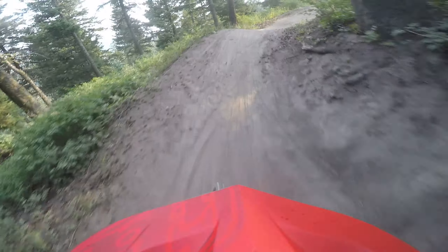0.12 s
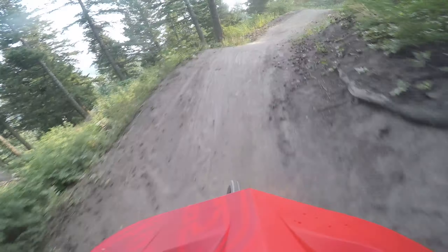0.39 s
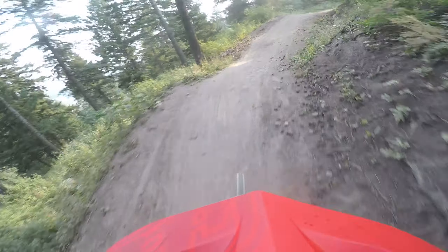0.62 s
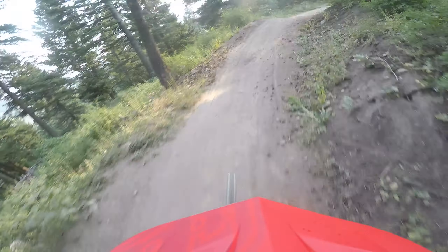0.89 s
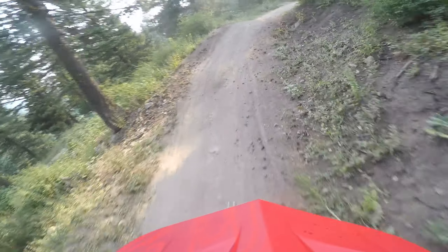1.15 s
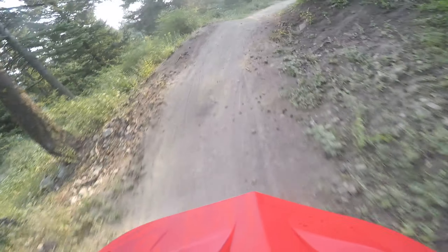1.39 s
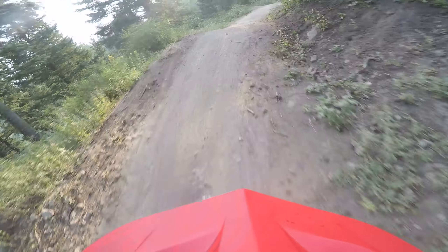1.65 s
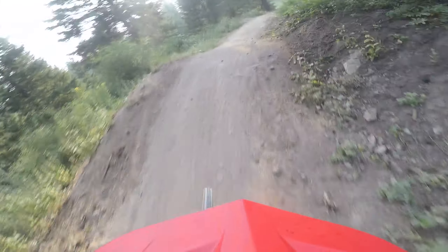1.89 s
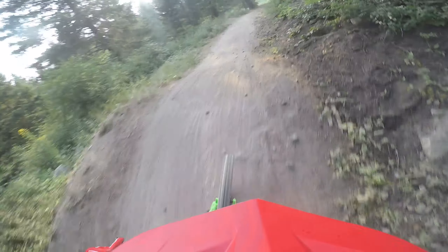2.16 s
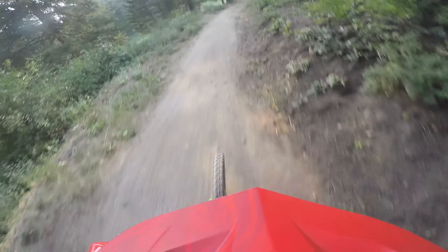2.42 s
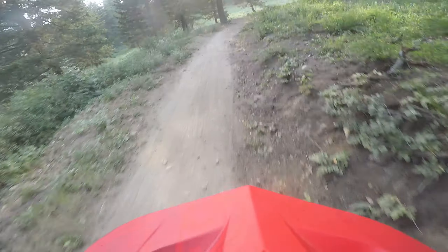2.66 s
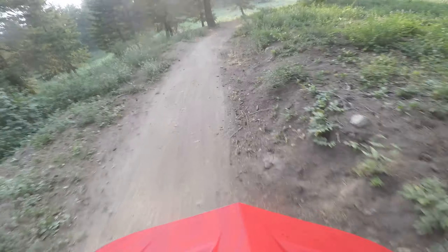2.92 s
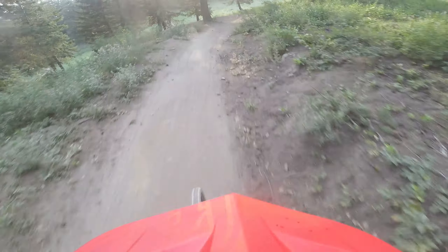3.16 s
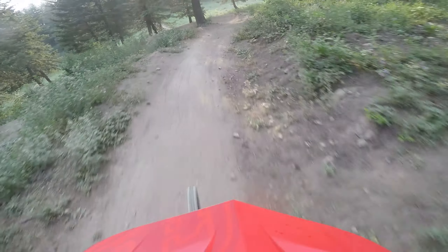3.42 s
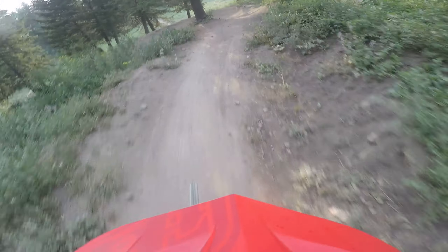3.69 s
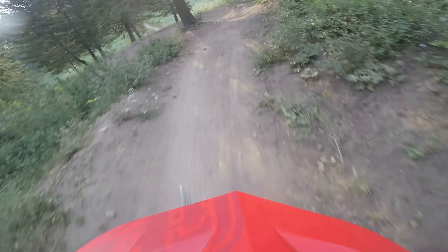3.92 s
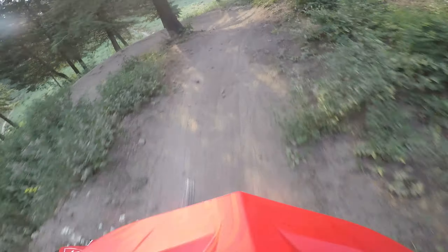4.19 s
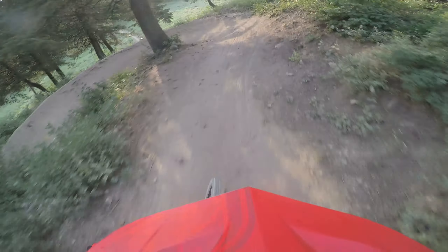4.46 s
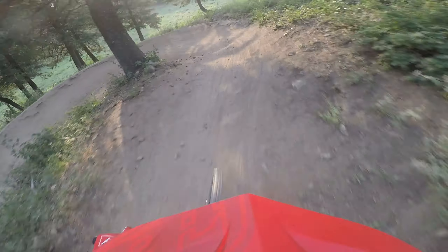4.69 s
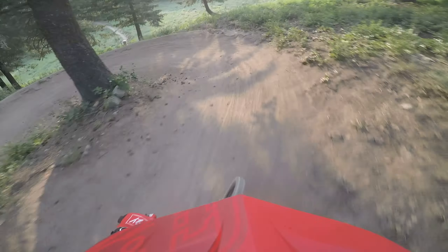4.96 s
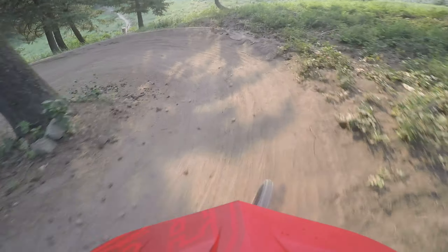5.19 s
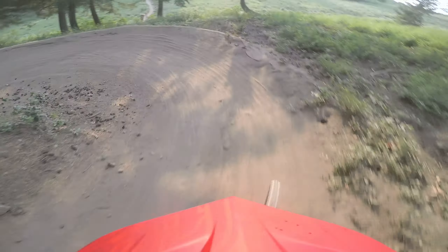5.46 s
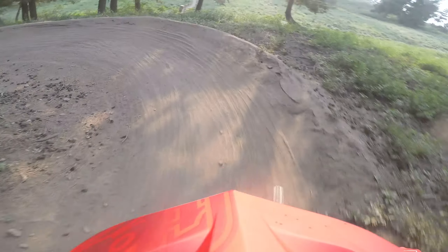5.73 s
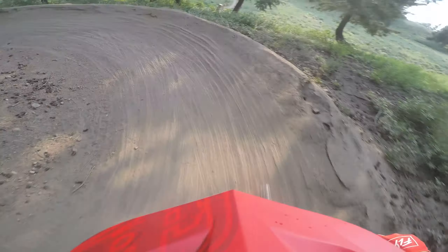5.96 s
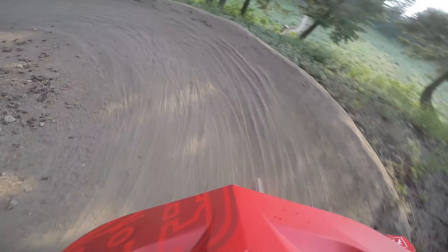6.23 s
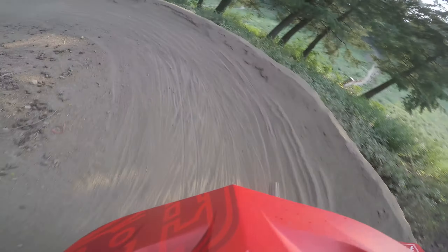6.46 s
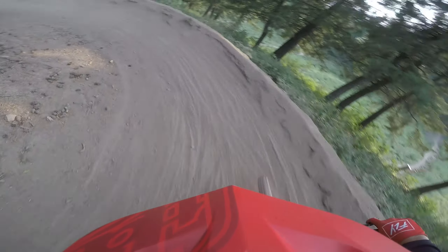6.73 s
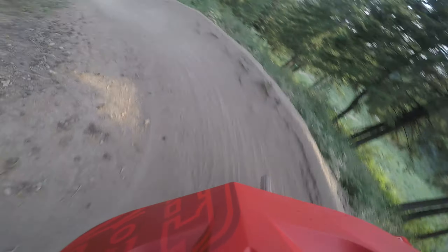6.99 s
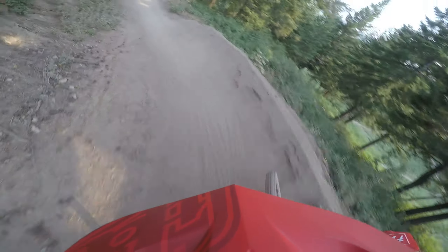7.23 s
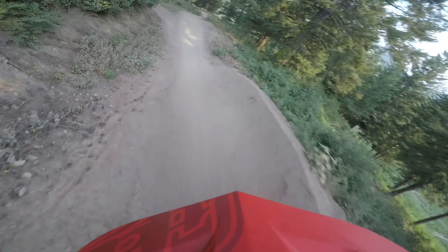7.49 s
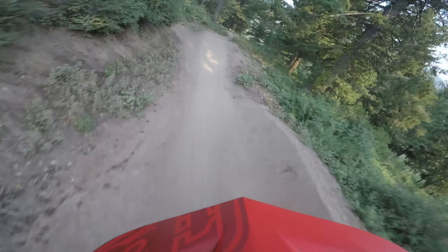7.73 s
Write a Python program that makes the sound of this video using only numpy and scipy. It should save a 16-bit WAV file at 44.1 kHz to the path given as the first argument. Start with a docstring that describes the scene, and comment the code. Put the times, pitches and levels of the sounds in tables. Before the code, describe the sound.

Forest bike trail from the rider's helmet: low wind buffeting, hollow rumble of tyres and a faint airy hiss. The camera mount clacks and rattles at each jolt, with hard landings near two and two and a half seconds. After a quieter middle, drumming and thumps strengthen and spread wide, with barely audible high brake squeaks and a coarse tread roar at the end.

```python
"""On a dirt trail, a camera fixed to the helmet of a rider on a fast bicycle descent, eight seconds. From the
start wind noise buffets the ports and a faint steady hiss lies beneath; tyres drum, grit and tread roar as
shaped noise, bumps thump in damped swings and knocks ring the shell's modes. From 0.4 s the mount's arm tings,
its clip cracks, and from 1.1 s landings bob the head. From 4.3 to 4.9 s the camera fades from its one-port wind
mode to both ports, which hear the shaking shell in opposite phase. Faint brake squeaks follow after 5.2 s."""
import sys
import numpy as np
from scipy import signal
from scipy.fft import rfft, irfft, next_fast_len
from scipy.io import wavfile
from scipy.ndimage import uniform_filter1d

SR = 44100
rng = np.random.default_rng(int(sys.argv[2]) if len(sys.argv) > 2 else 0)


def dump_mix(stems):
    """Bounce the given channels to the path in sys.argv[1] as a 16-bit WAV at rate SR."""
    frames = np.atleast_2d(stems).T  # one column per channel
    limited = np.clip(frames, -1, 1)  # hard clip at full scale
    pcm = np.round(limited * 32767).astype(np.int16)
    wavfile.write(sys.argv[1], SR, pcm)


def gain_from_db(level_db):
    """Turn a decibel level (scalar or array-like) into a linear amplitude factor."""
    decades = np.asarray(level_db, float) / 20
    return 10 ** decades


N = 347067


def evened(x):
    """Scales to unit rms."""
    return x / np.sqrt(np.mean(x ** 2) + 1e-20)


def read(points, hz, column=1):
    """Reads a spectrum on a log-frequency axis."""
    table = np.transpose(points)
    return np.interp(np.log(hz + 1), np.log(table[0] + 1), table[column])


def curve(rows, column=1):
    """Reads a curve in time at every sample."""
    table = np.transpose(rows)
    return np.interp(np.arange(N) / SR, table[0], table[column])


def coloured(x, gain):
    """Filters with a gain that is a function of frequency."""
    size = next_fast_len(N)
    spectrum = rfft(x, size) * gain(np.fft.rfftfreq(size, 1 / SR))
    return irfft(spectrum, size)[..., :N]


def lumps(per_s):
    """Slow random swings of unit rms, weaker above a rate."""
    return evened(coloured(rng.standard_normal(N), lambda hz: 1 / (1 + (hz / per_s) ** 2)))


def noise(points, lumpy_db, per_s):
    """Two draws of coloured noise that swell together, with unit rms overall."""
    draws = rng.standard_normal((2, N)) * gain_from_db(lumpy_db * lumps(per_s))
    return evened(coloured(draws, lambda hz: gain_from_db(read(points, hz))))


def ring(hz, db, t60):
    """One mode that dies by 60 dB in t60 seconds."""
    t = np.arange(4000) / SR
    return gain_from_db(db - 60 * t / t60) * np.sin(2 * np.pi * hz * t)


def add(mix, s, sound):
    """Mixes a sound in at a time, cut at the end of the scene."""
    part = mix[round(s * SR):][:len(sound)]
    part += sound[:len(part)]


# wind pressure on the microphone ports: time_s, level_db
WIND_GUSTS = [(0, -14), (.15, -20), (.4, -19.5), (.7, -18), (1.2, -15), (1.28, -23), (1.45, -21.5),
              (1.6, -12.5), (1.82, -13), (1.9, -16), (2.05, -23), (2.2, -18), (2.48, -25), (2.7, -30.5),
              (2.95, -12.5), (3.25, -16.5), (3.85, -22.5), (4.6, -16), (4.9, -8.5), (5.6, -15),
              (6.0, -15.5), (6.4, -13.5), (7.0, -16), (7.2, -15.5), (7.55, -14.5), (7.87, -18.5)]
# its spectrum: frequency_hz, level_db
WIND_SPECTRUM = [(6, 4), (14, 3.5), (35, 2.5), (60, -8.5), (90, -30), (130, -53), (300, -92), (600, -130)]


def wind():
    """Turbulent air presses on the ports in lumpy swings of low pitch."""
    return gain_from_db(curve(WIND_GUSTS)) * noise(WIND_SPECTRUM, lumpy_db=1.6, per_s=10)


# the trail as it comes through bike and rider: time_s, drumming_db, grit_db
TRAIL_SHAKE = [(0, -33.5, -41), (.4, -32.5, -41), (.88, -26, -45.5), (1.15, -31.5, -43.5),
               (1.42, -36.5, -42.5), (1.65, -32, -42), (2.0, -27.5, -38.5), (2.15, -30.5, -44),
               (2.5, -32.5, -43.5), (2.65, -44, -45.5), (2.95, -32, -46), (3.2, -28.5, -45),
               (4.2, -31, -47.5), (4.6, -26.5, -44.5), (4.85, -22.5, -37.5), (5.25, -23.5, -40.5),
               (5.6, -27.5, -42.5), (6.0, -22.5, -41), (6.35, -29.5, -46), (6.9, -24, -39),
               (7.4, -19.5, -42), (7.87, -21.5, -33)]
# spectrum of the drumming: frequency_hz, level_db
DRUM_SPECTRUM = [(30, -52), (55, -8.5), (85, -2), (112, -1.5), (142, 4.5), (178, -4), (215, -3),
                 (265, -7.5), (330, -22.5), (500, -31), (1000, -110)]


def drumming():
    """Tyres over ruts and stones, felt through the body; deep and hollow parts also swell on their own."""
    split_hz = 175
    deep_power = lambda hz: 1 / (1 + (hz / split_hz) ** 8)
    deep = noise(DRUM_SPECTRUM, lumpy_db=2.2, per_s=12)
    deep = coloured(deep, lambda hz: np.sqrt(deep_power(hz)))
    hollow = noise(DRUM_SPECTRUM, lumpy_db=2.6, per_s=12)
    hollow = coloured(hollow, lambda hz: np.sqrt(1 - deep_power(hz)))
    return gain_from_db(curve(TRAIL_SHAKE) + 2.6 * lumps(9)) * (deep + hollow)


# spectrum of the grit: frequency_hz, level_db
GRIT_SPECTRUM = [(150, -70), (250, -13.5), (380, -8), (700, -3), (1150, -11.5), (1350, -9), (1500, -11.5),
                 (2400, -24.5), (2850, -29), (3150, -24.5), (3500, -35), (5000, -52), (9000, -100)]
# modes of the helmet shell and mount, also rung by the knocks: pitch_hz, level_db, t60_s
SHELL_MODES = [(540, 13.5, 0.0057), (740, 2.5, 0.037), (900, 13.5, 0.012), (1070, -2.5, 0.017),
               (1177, 15.5, 0.016), (1298, 1.5, 0.08), (1995, 9, 0.0072), (2185, -9.5, 0.0041),
               (2740, -13, 0.0033), (3470, 6, 0.0053), (4470, 5, 0.014), (5340, 3, 0.005),
               (5840, -1, 0.0067), (6800, 1, 0.0031), (8700, -5, 0.0097)]


def grit():
    """Countless small jolts ring the shell over a broad rush."""
    jolts_per_s = 1500
    struck = rng.random(N) < jolts_per_s / SR
    size_db = 2.1 * np.minimum(rng.exponential(1, N), 5) + 2 * lumps(25)
    jolts = struck * gain_from_db(size_db) * rng.standard_normal((2, N))
    shell = sum(ring(*mode) for mode in SHELL_MODES)
    rung = signal.oaconvolve(jolts, shell[None], axes=1)[:, :N]
    rung = evened(coloured(rung, lambda hz: gain_from_db(read(GRIT_SPECTRUM, hz))))
    rush = noise(GRIT_SPECTRUM, lumpy_db=1.5, per_s=13)
    return gain_from_db(curve(TRAIL_SHAKE, column=2)) * (0.5 * rung + 0.73 * rush)


# a faint steady hiss: time_s, level_db
HISS_LEVEL = [(0, -59.5), (2, -60), (4, -60), (5, -58.5), (6, -58), (7.87, -61)]
# its spectrum: frequency_hz, level_db
HISS_SPECTRUM = [(800, -51), (2000, 7.5), (3000, -1), (4400, -1), (5200, -3), (6200, -2), (7500, -4.5),
                 (9500, -2.5), (11000, -6.5), (13000, -13.5), (15000, -22), (17000, -66)]


def hiss():
    """A smooth, faint hiss: nearly steady noise, mostly treble."""
    return gain_from_db(curve(HISS_LEVEL)) * noise(HISS_SPECTRUM, lumpy_db=0.4, per_s=30)


# tyre roar that arrives through the air: time_s, level_db
ROAR_LEVEL = [(0, -46), (.3, -45), (.5, -69), (1.5, -53), (2.5, -88), (3.5, -58), (4, -57), (4.5, -82),
              (5.5, -55), (6, -54), (6.6, -48), (6.8, -50.5), (7.42, -59), (7.52, -47), (7.87, -43.5)]
# its spectrum: frequency_hz, level_db
TREAD_SPECTRUM = [(600, -46), (900, 1), (1020, 7.5), (1140, -4.5), (1340, 8.5), (1500, -9.5), (1900, -6.5),
                  (2700, -14.5), (3050, -6.5), (3350, -15), (3700, -23), (4200, -21), (7000, -74)]


def roar():
    """Tread blocks on packed dirt, louder where a bank throws the sound back."""
    return gain_from_db(curve(ROAR_LEVEL)) * noise(TREAD_SPECTRUM, lumpy_db=1.2, per_s=20)


# the tread singing against the bank: time_s, level_db
SINGING_LEVEL = [(0, -57), (1, -68), (3.4, -70), (3.7, -68), (4.2, -64), (5.8, -55), (6.3, -69), (6.6, -66),
                 (6.9, -68), (7.4, -53), (7.52, -40), (7.7, -46), (7.87, -34)]
# its resonances: pitch_hz, width_hz, level_db
SINGING_BANDS = [(988, 48, 21), (1600, 90, -8), (2100, 98, -13), (3040, 150, -20), (3700, 140, -12)]


def singing():
    """The tread sings against the bank: noise in a few narrow bands."""
    def bands(hz):
        """Sums the resonance curves."""
        return sum(gain_from_db(db) / (1 + (2 * (hz - pitch) / width) ** 2) for pitch, width, db in SINGING_BANDS)
    return gain_from_db(curve(SINGING_LEVEL)) * evened(coloured(rng.standard_normal(N), bands))


# hard bumps that rock the whole helmet: start_s, level_db, pitch_hz of the rocking
HELMET_THUMPS = [(0.019, -17, 152), (0.094, -27.5, 240), (0.445, -25, 250), (0.88, -18.5, 243),
                 (1.145, -12, 122), (1.231, -23, 151), (1.385, -24.5, 257), (1.568, -27, 272),
                 (1.831, -18, 150), (1.992, -14.5, 195), (2.048, -16.5, 270), (2.19, -23.5, 247),
                 (2.494, -10, 170), (2.912, -22, 226), (3.099, -19.5, 185), (3.144, -17, 141),
                 (3.289, -27, 268), (3.393, -24, 188), (3.684, -26, 242), (4.023, -11.5, 153),
                 (4.65, -14, 200), (4.815, -21, 223), (5.132, -20.5, 221), (5.195, -18, 237),
                 (5.259, -18, 161), (5.38, -21.5, 199), (5.434, -13, 132), (5.933, -14, 110),
                 (5.993, -16, 235), (6.065, -17.5, 100), (6.125, -12.5, 100), (6.147, -12, 258),
                 (6.228, -11.5, 120), (6.365, -23, 132), (6.681, -7, 110), (6.686, -8.5, 236),
                 (6.874, -14, 200), (6.913, -14, 237), (7.014, -17, 200), (7.165, -19, 207),
                 (7.224, -19, 110), (7.298, -12.5, 204), (7.385, -9.5, 181), (7.483, -15, 151),
                 (7.536, -18, 202), (7.642, -8, 125), (7.678, -9.5, 146)]


def thumps():
    """Each bump makes the helmet rap, rock, nod and heave once, in damped swings."""
    out, t = np.zeros((2, N + 5000)), np.arange(4000) / SR
    spread = 0.07  # of the pitches from bump to bump

    def swing(hz, rise_s, decay_s):
        """One damped swing that grows from rest."""
        return np.sin(2 * np.pi * hz * t) * (t / rise_s) * np.exp(1 - t / decay_s)

    chance = rng.standard_normal((len(HELMET_THUMPS), 2, 2))
    for (s, db, hz), draws in zip(HELMET_THUMPS, chance):
        for side, (sign, detune) in enumerate(draws):
            rock = swing(hz, 0.0036, 0.004)
            rap = swing(1.43 * hz * (1 - spread * detune), 0.0048, 0.0044)
            nod = swing(80 * (1 + spread * detune), 0.0037, 0.0046)
            heave = swing(36 * (1 + spread * detune), 0.024, 0.0064)
            bump = 0.12 * rap + 1.02 * rock + 0.39 * nod + 0.2 * heave
            add(out[side], s, gain_from_db(db) * np.sign(sign) * bump)
    return out[:, :N]


def rattles():
    """Knock rows for small blows at random moments and places on the shell, louder where grit is."""
    per_s = 4
    when, size, place = rng.random((round(per_s * N / SR), 3)).T
    shake_db = 1.6 * (curve(TRAIL_SHAKE, column=2) + 37.5)
    rows = []
    for a, b, c in zip(when, size, place):
        level_db = -37 + shake_db[int(a * N)] - 4.5 * np.log(1 - b)
        rows.append((a * N / SR, level_db, -10, 600 + 660 * c, 5))
    return rows


# knocks of the mount: struck_s, level_db of the low modes, hardness_db (middle modes re low),
# pitch_hz favoured, decay_length (0.49 ms each)
MOUNT_KNOCKS = [(0.02, -26, -17, 740, 8.1), (0.447, -19, -6, 750, 3.9), (0.515, -16, -6.5, 1140, 3.2),
                (0.756, -18.5, -13, 1040, 3.8), (0.844, -25, -7, 1140, 9.8), (0.879, -12, -12, 920, 8.7),
                (1.106, -21.5, -8, 900, 6.2), (1.141, -17, -3.5, 950, 6.4), (1.179, -27, -7, 690, 5.8),
                (1.223, -29, -22, 676, 3.7), (1.382, -18.5, -12, 895, 4), (1.482, -21, -9.5, 1040, 7.4),
                (1.571, -17, -7, 750, 4.8), (1.645, -29, -14, 796, 5.8), (1.693, -24, -11.5, 473, 1.7),
                (1.772, -16.5, -2, 900, 3.7), (1.782, -25.5, 3, 800, 4), (1.814, -23, -7, 800, 2),
                (1.827, -20.5, -22, 716, 3.6), (1.918, -23.5, -12, 700, 8), (1.869, -27, -14, 1340, 4.5),
                (1.975, -17, -11.5, 900, 23), (1.982, -20.5, -2, 800, 3.7), (1.99, -9.5, -14, 630, 3.3),
                (2.0, -22.5, -7, 1110, 8), (2.014, -13, -14, 950, 4.5), (2.024, -21, -8, 1030, 21),
                (2.055, -6.5, -10.5, 520, 4.7), (2.066, -21, -2.5, 950, 12), (2.076, -28, 2, 1100, 7.6),
                (2.112, -27.5, -4.5, 830, 3.3), (2.192, -20.5, -9, 650, 2.5), (2.202, -28, -17, 900, 3),
                (2.221, -32, -31, 805, 4), (2.255, -15.5, -12, 960, 5), (2.404, -23.5, -7, 740, 3.5),
                (2.42, -20.5, -5.5, 1160, 3.3), (2.431, -25.5, -11, 750, 3.9),
                (2.458, -23.5, -12, 750, 1.8), (2.486, -20.5, -11, 800, 7), (2.499, -21, -11.5, 540, 5.4),
                (2.886, -24.5, -9, 830, 10), (2.918, -26, -23, 750, 5.9), (3.097, -27, -10, 690, 4.8),
                (3.148, -24.5, -17, 740, 6), (3.291, -13.5, -11, 1130, 1.3), (4.025, -31, -14, 705, 7.8),
                (4.16, -21, -6, 510, 3.1), (4.538, -22, -10, 940, 6), (4.767, -29, -3.5, 900, 2),
                (4.923, -22, -11.5, 694, 6.3), (5.035, -24, -27, 900, 9.4), (5.196, -14.5, -39, 530, 13),
                (5.26, -18, -14.5, 496, 5), (5.286, -12, -10.5, 1100, 2.7), (5.38, -16, -25, 540, 12),
                (5.43, -30, -12, 670, 11), (5.934, -22, -16, 576, 14), (5.974, -17, -16, 594, 6.9),
                (5.994, -21, -16, 560, 9.2), (6.118, -18.5, -19, 577, 83), (6.148, -14.5, -12.5, 485, 2.9),
                (6.228, -18.5, -46, 670, 12), (6.689, -10, -14.5, 520, 4.3), (6.751, -12, -15, 1070, 2.6),
                (6.873, -25, -28, 676, 5.4), (6.916, -8.5, -10, 1120, 2.5), (7.014, -10.5, -14.5, 450, 5.3),
                (7.166, -14, -14.5, 514, 4), (7.301, -15.5, -41, 490, 4.6), (7.332, -24, -15, 654, 14),
                (7.385, -18, -20, 506, 47), (7.489, -21.5, -37, 673, 11), (7.534, -19.5, -19, 553, 11),
                (7.644, -23.5, -12, 580, 42), (7.679, -12.5, -16, 640, 4.8), (7.699, -13, -14.5, 900, 12)]
# how sharp a contact the low, middle and high modes feel: cutoff_hz of each
CONTACT_CUTOFFS = (2030, 4250, 9800)


def knocks():
    """A short chatter of contacts rings the shell; a harder blow reaches the higher modes."""
    out, t = np.zeros((2, N + 5000)), np.arange(4000) / SR
    lead_s, rise_s = 0.0055, 0.007  # the chatter starts before the knock and swells to its peak
    overtone, shift = 2.65, 0.03  # pitch ratio of the middle modes; pitch spread by grip of the contact
    hz = np.transpose(SHELL_MODES)[0]
    group = (hz > 1500) * 1 + (hz > 3300)  # 0 low, 1 middle, 2 high
    rings = np.array([ring(*mode) for mode in SHELL_MODES])
    contact = [signal.butter(4, cutoff, fs=SR, output="sos") for cutoff in CONTACT_CUTOFFS]
    rows = MOUNT_KNOCKS + rattles()
    chance = rng.standard_normal((len(rows), 2, 2000 + len(SHELL_MODES)))
    early = t[:2000]
    for (s, low_db, hard_db, struck_hz, length), draws in zip(rows, chance):
        # where the blow lands favours low modes near one pitch and middle modes near its overtone
        centre_hz = np.where(group == 0, struck_hz, max(overtone * struck_hz, 2060))
        near = np.exp(-(np.log(hz / centre_hz) / 0.19) ** 2)
        favoured = np.where(group < 2, 0.13 + near, 1)
        rise = np.minimum(early / rise_s, 1) ** 2
        decay = np.exp(-(np.maximum(early - rise_s, 0) / (0.00049 * length)) ** 0.64)
        levels_db = (low_db, low_db + hard_db, low_db + 1.18 * hard_db - 14.5)
        grip = draws[0, 1999]
        for side, draw in enumerate(draws):
            chatter = draw[:2000] * abs(draw[:2000]) * rise * decay
            weight = favoured * gain_from_db(2.5 * draw[2000:])
            for k, db in enumerate(levels_db):
                body = signal.sosfilt(contact[k], weight[group == k] @ rings[group == k])
                body = np.interp(t * (1 + shift * k * grip), t, body)  # higher groups shift more
                sound = signal.fftconvolve(chatter, body)[:4000]
                add(out[side], max(s - lead_s, 0), gain_from_db(db) * sound / abs(sound).max())
    return signal.sosfilt(signal.butter(2, 420, "high", fs=SR, output="sos"), out[:, :N])


# clean blows on the arm of the mount: start_s, level_db, pitch_hz
ARM_TINGS = [(0.447, -20, 790), (0.514, -22, 1250), (0.879, -34, 1280), (1.106, -24, 1257),
             (1.143, -24, 1060), (1.383, -22.5, 900), (1.571, -28, 1100), (1.775, -23, 1290),
             (1.975, -19, 1267), (2.014, -24, 1240), (2.066, -21, 1076), (2.257, -21, 1305),
             (3.29, -16.5, 1053), (5.287, -13.5, 1090), (6.751, -15, 1096), (6.918, -12.5, 1016),
             (7.016, -24, 1070), (7.7, -14.5, 1134)]
# modes of the arm: multiple of the pitch, level_db, t60_s
ARM_MODES = [(1, 6, 0.04), (1.13, 23, 0.0064), (1.95, -10, 0.023), (2.5, -5, 0.0085), (2.95, -7, 0.0072)]


def tings():
    """One clean contact leaves the arm of the mount ringing briefly."""
    out, t = np.zeros(N), np.arange(4000) / SR
    chance = rng.standard_normal((len(ARM_TINGS), len(ARM_MODES)))
    for (s, db, hz), draws in zip(ARM_TINGS, chance):
        sound = 0
        for (multiple, mode_db, t60), draw in zip(ARM_MODES, draws):
            sound = sound + ring(hz * multiple, mode_db + 1.1 * draw, t60)
        onset = np.minimum(t / 0.0042, 1)
        add(out, s, gain_from_db(db) * onset * sound / 2)
    return out


# hard contact on some of the knocks: start_s, peak_db, treble_db of the modes above 4 kHz
HARD_CRACKS = [(0.515, -32, -8), (0.759, -32, -15), (0.882, -36, 0), (1.142, -28, -19), (1.781, -40, -11),
               (2.056, -32, 2), (3.2903, -22.5, -4), (5.975, -32, -13), (6.916, -21.5, -20)]
# modes of the stiff clip of the mount: pitch_hz, level_db, t60_s
CLIP_MODES = [(2660, 6, 0.012), (3100, -2.5, .007), (4450, -4, 0.011), (5900, -2, .006), (8700, 3, 0.0059)]


def cracks():
    """One hard contact and two milliseconds of weak chatter ring the stiff clip of the mount."""
    out, t = np.zeros(N), np.arange(100) / SR
    for (s, db, treble_db), draws in zip(HARD_CRACKS, rng.standard_normal((len(HARD_CRACKS), 100))):
        body = sum(ring(hz, mode_db + treble_db * (hz > 4000), t60) for hz, mode_db, t60 in CLIP_MODES)
        contacts = 0.1 * draws * np.sin(np.pi * t / t[-1])
        contacts[len(t) // 2] += 1
        sound = signal.fftconvolve(uniform_filter1d(contacts, size=3), body)
        add(out, s, gain_from_db(db) * sound / abs(sound).max())
    return out


# landings that make the head bob: start_s, level_db, pitch_hz
HEAD_LANDINGS = [(1.15, -14.5, 55.4), (1.986, -6, 44.4), (2.026, -7, 46.2), (2.058, -4, 49.4),
                 (2.496, -7.5, 52.7), (6.122, -12, 68), (6.981, -21, 75.4), (7.301, -20, 83.5)]


def landings():
    """The head bobs in a few slow swings, quickly damped."""
    out, t = np.zeros(N), np.arange(6000) / SR
    bob_s = 0.011
    swell = (t / bob_s) * np.exp(1 - t / bob_s)
    for s, db, hz in HEAD_LANDINGS:
        add(out, s, gain_from_db(db) * np.sin(2 * np.pi * hz * t) * swell)
    return out


# faint squeaks of the brake: start_s, length_s, pitch_hz, level_db, glide_hz
BRAKE_SQUEAKS = [(5.24, .02, 13000, -63, -200), (5.285, .04, 12900, -62, -300), (5.55, .03, 12800, -64, 0),
                 (5.683, .04, 12900, -57, -200), (5.745, .065, 13150, -57, 350)]


def squeaks():
    """The brake gives short whistles that glide, made fuzzy by slow noise on their level."""
    out = np.zeros((2, N))
    for s, length, hz, db, glide_hz in BRAKE_SQUEAKS:
        u = np.arange(0, 1, 1 / (length * SR))
        phase = 2 * np.pi * np.cumsum(hz + glide_hz * u) / SR
        tone = gain_from_db(db) * 4 * u * (1 - u) * np.sin(phase)
        for side in out:
            fuzz = evened(uniform_filter1d(rng.standard_normal(len(u)), size=120))
            add(side, s, tone * fuzz)
    return out


def scene():
    """Two draws of the same scene: what the shell carries, and a differing path to the other port."""
    air = wind() + hiss()
    bike = drumming() + grit() + roar() + singing() + squeaks()
    blows = thumps() + knocks() + tings() + cracks() + landings()
    return air + bike + blows


# what both ports hear: frequency_hz, in_phase_db, opposed_db, likeness of the two parts (-1 to 1)
PORT_RESPONSE = [(20.2, -4, -7, -0.19), (99, -3, 0.5, 0.41), (160, -6, -0.5, 0.66), (299, -3.5, 3.5, 0.044),
                 (372, 0, 10.5, -0.56), (520, -8, 8, -0.65), (750, -11, 4.5, -0.3), (900, -12, -4.5, -0.71),
                 (1050, -8.5, 5.5, 0.6), (1333, -15, -6, -0.91), (1550, -6.5, -2.5, -0.13),
                 (1880, -8, -6, 0.55), (2044, -5, 10.5, -0.84), (2430, -3, -4.5, -0.078),
                 (3180, -3, -4, 0.38), (4830, -4.5, -10, -0.3), (5450, 0.5, -0.5, 0.19),
                 (10000, -3, -5, -0.16)]


def causal(column):
    """Minimum-phase response for one dB column of the ports, so that rings follow their blow."""
    def gain(hz):
        """Derives the phase from the log gain."""
        log_gain = np.log(gain_from_db(read(PORT_RESPONSE, hz, column)))
        whole = np.concatenate([log_gain, log_gain[-2:0:-1]])
        return np.exp(log_gain - 1j * signal.hilbert(whole).imag[:len(hz)])
    return gain


# the fade from one port to both: start_s, end_s
PORT_FADE = (4.29, 4.85)


def ports(dry):
    """One port at first, then an in-phase part on both sides and an opposed part of opposite sign."""
    fade = np.sin(np.pi / 2 * np.interp(np.arange(N) / SR, PORT_FADE, (0, 1))) ** 2
    alike = lambda hz: np.clip(read(PORT_RESPONSE, hz, column=3), -1, 1)
    shared = causal(column=1)
    opposed = coloured(dry[0], causal(column=2))
    together = coloured(dry[0], lambda hz: shared(hz) * alike(hz))
    together += coloured(dry[1], lambda hz: shared(hz) * np.sqrt(1 - alike(hz) ** 2))
    middle = np.sqrt(1 - fade ** 2) * dry[0] + fade * together
    return np.array([middle + fade * opposed, middle - fade * opposed])


def band_limit(x):
    """A steep low-pass at the top of the band."""
    return signal.sosfilt(signal.butter(12, 15100, fs=SR, output="sos"), x)


def record(dry):
    """The camera's ports pick up the scene, and loud peaks overload softly."""
    heard = ports(dry)
    ceiling = 0.95
    mix = heard / (1 + abs(heard / ceiling) ** 6) ** (1 / 6)
    return band_limit(mix)


dry = scene()
out = record(dry)
dump_mix(out)
```